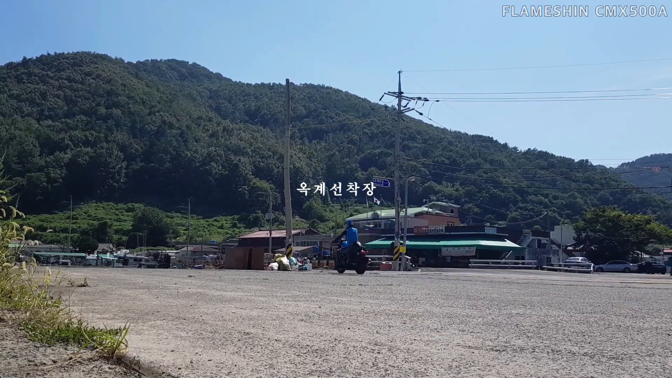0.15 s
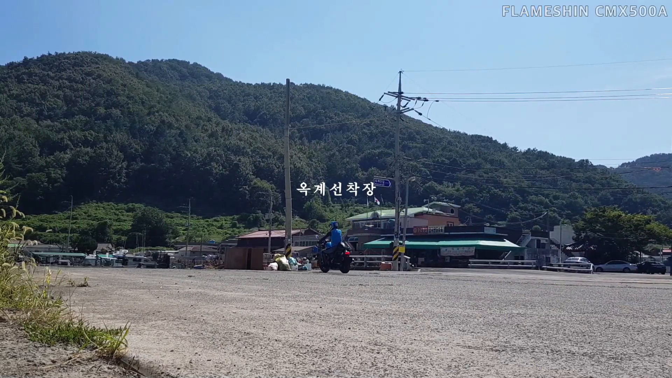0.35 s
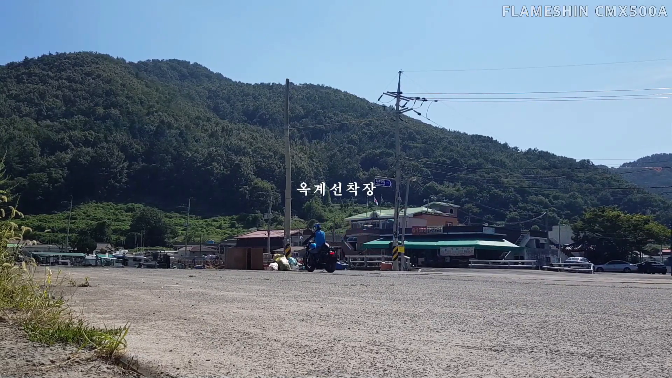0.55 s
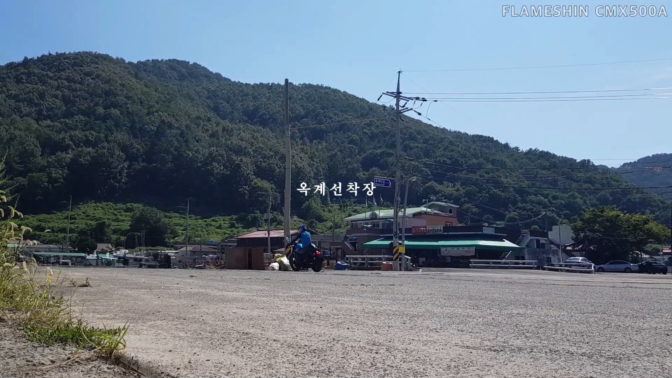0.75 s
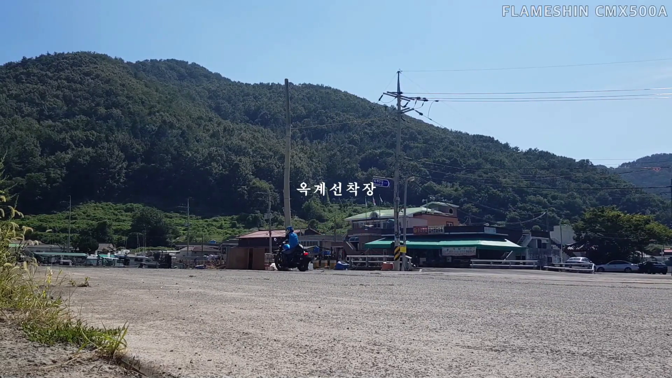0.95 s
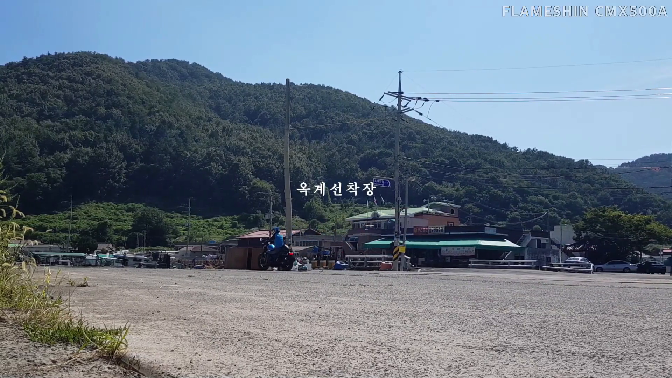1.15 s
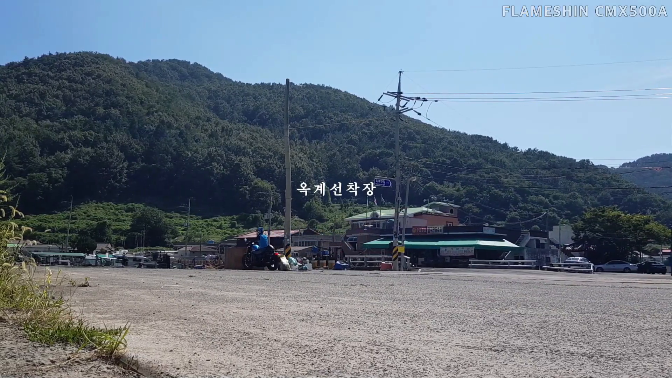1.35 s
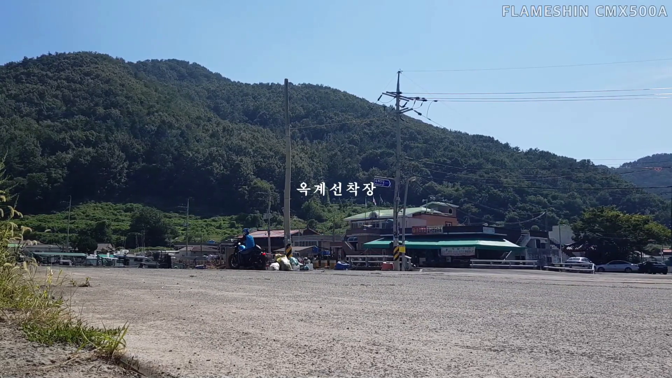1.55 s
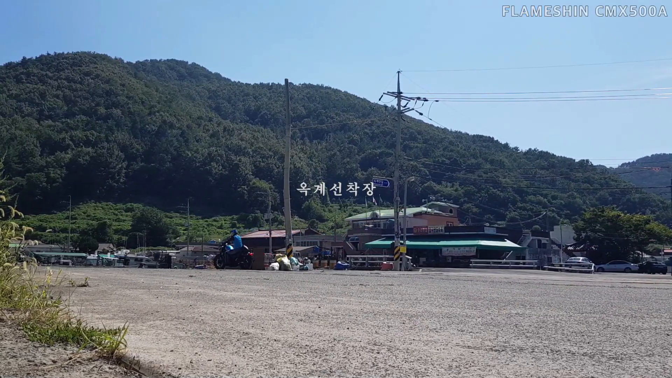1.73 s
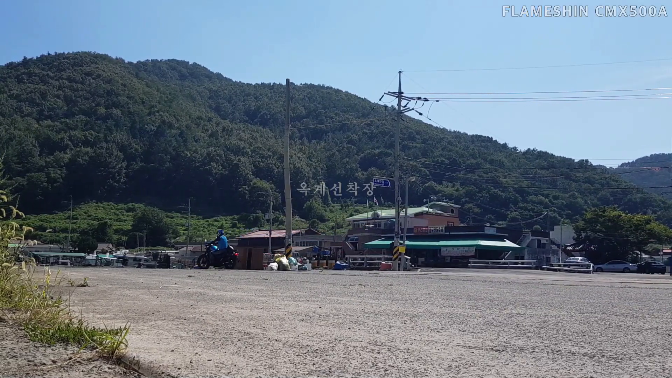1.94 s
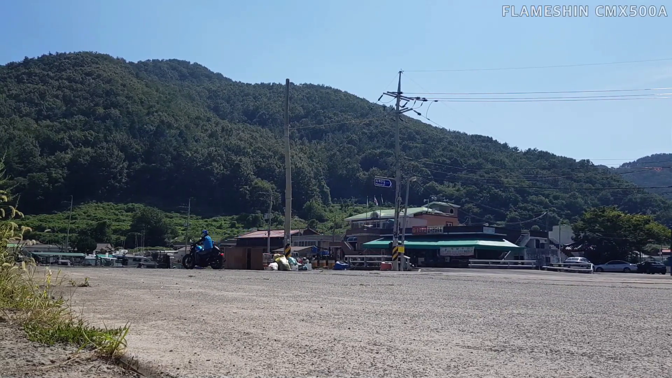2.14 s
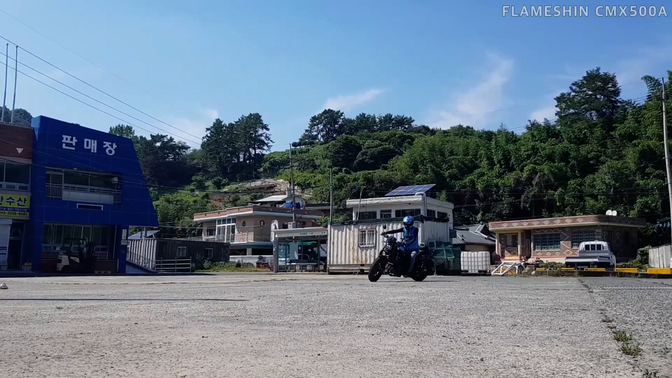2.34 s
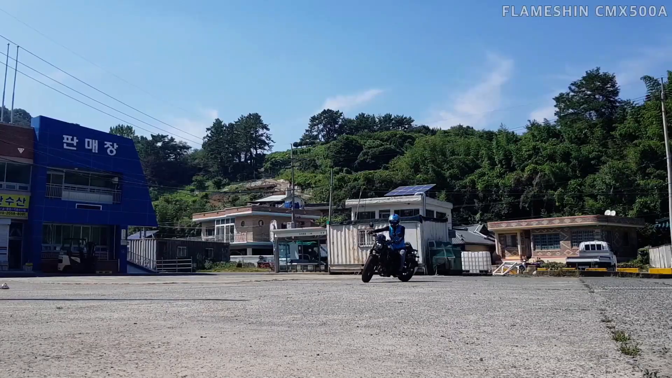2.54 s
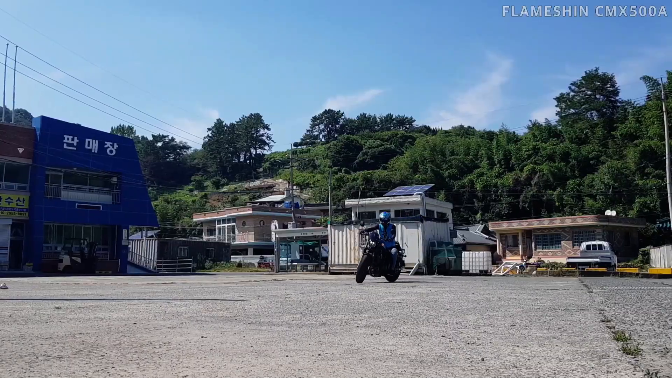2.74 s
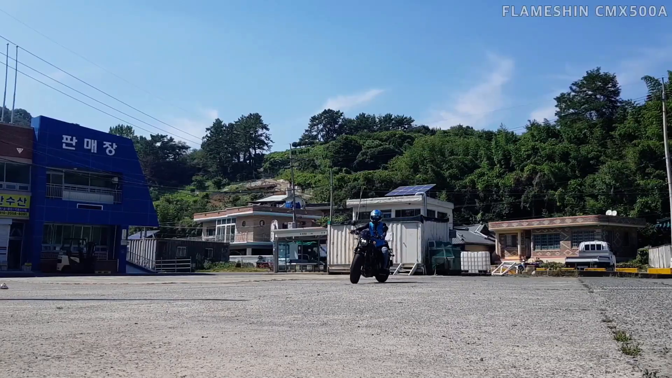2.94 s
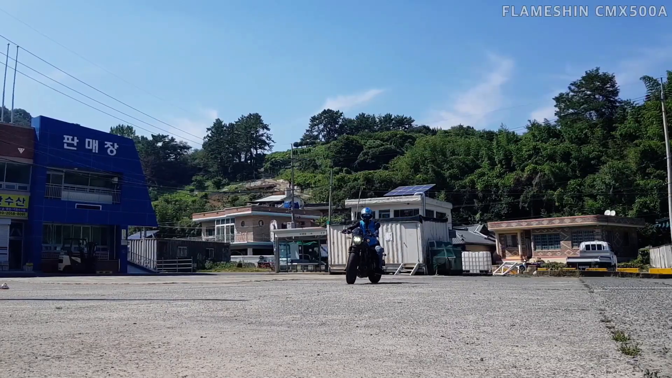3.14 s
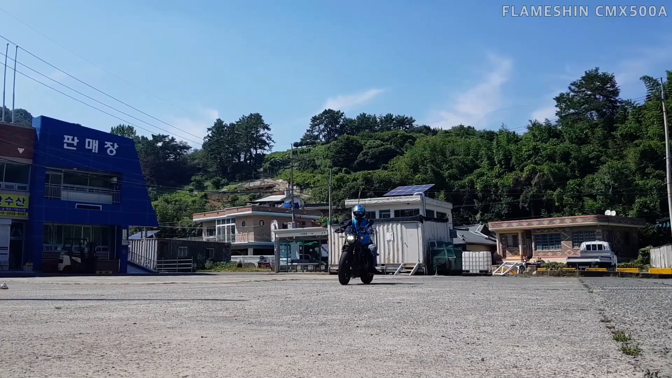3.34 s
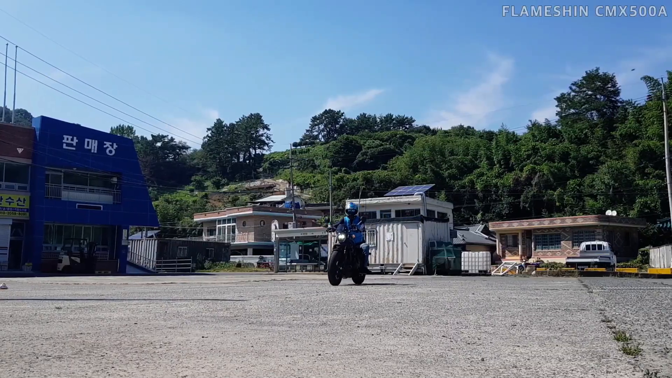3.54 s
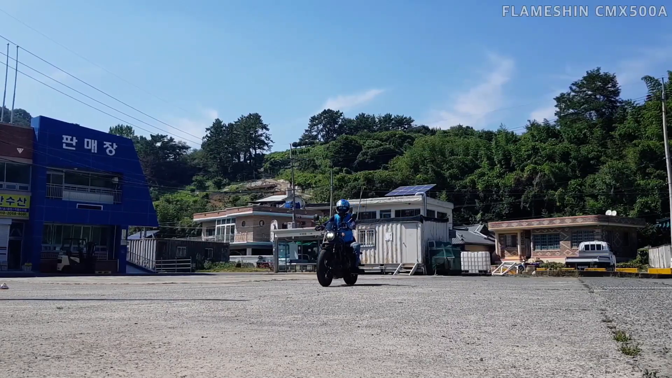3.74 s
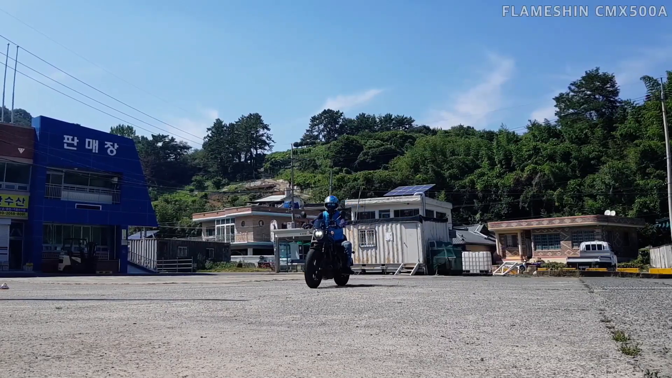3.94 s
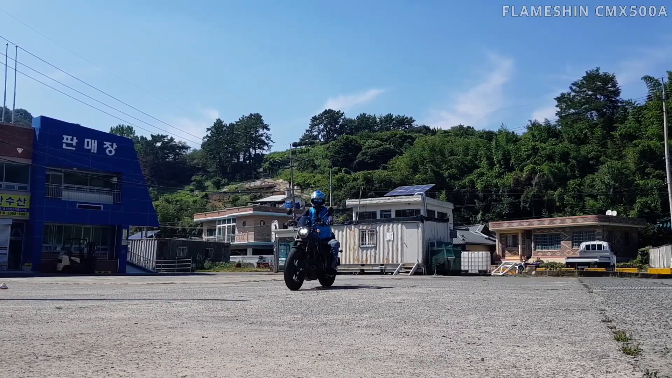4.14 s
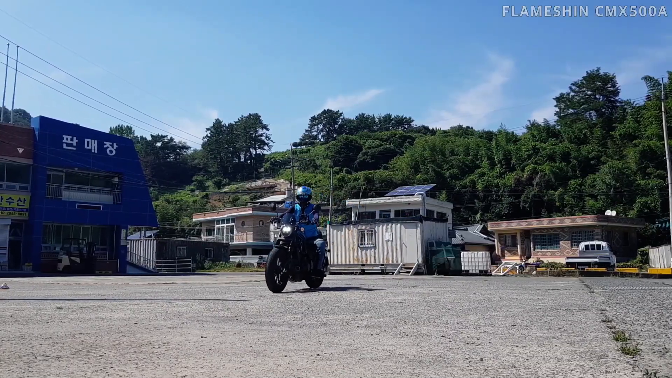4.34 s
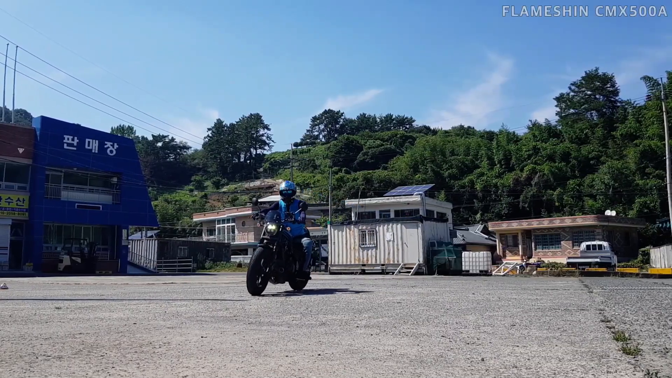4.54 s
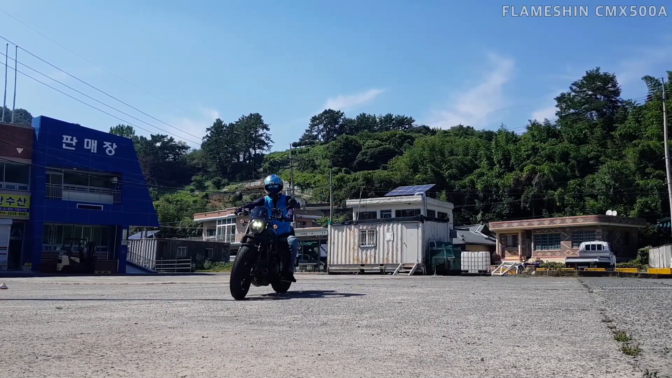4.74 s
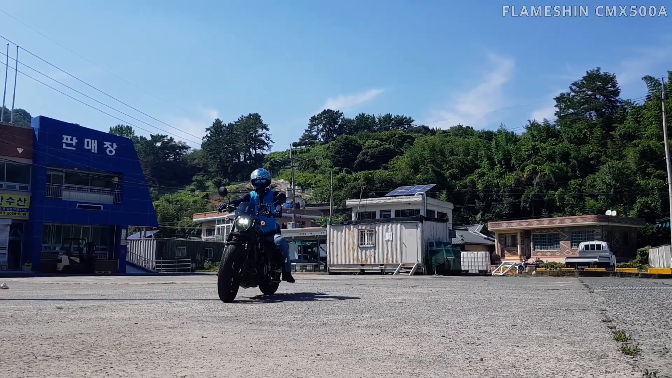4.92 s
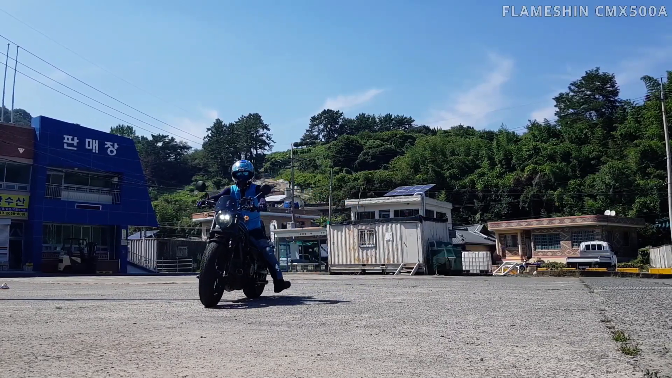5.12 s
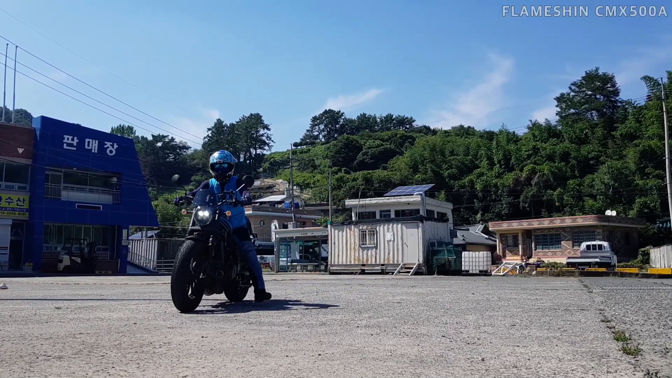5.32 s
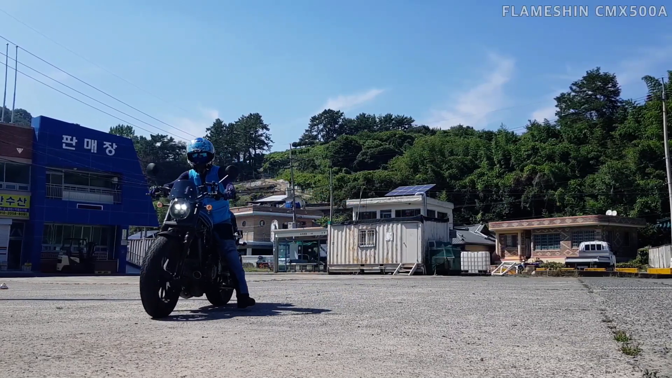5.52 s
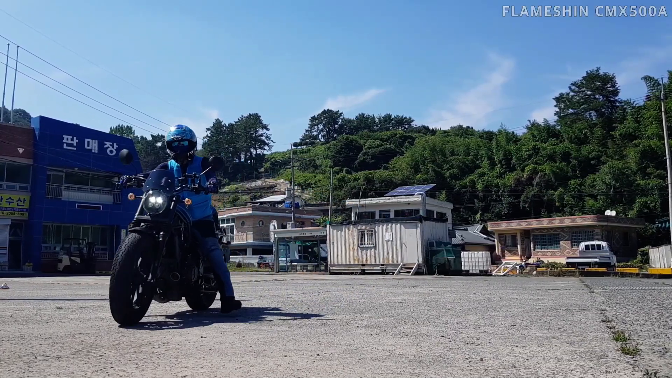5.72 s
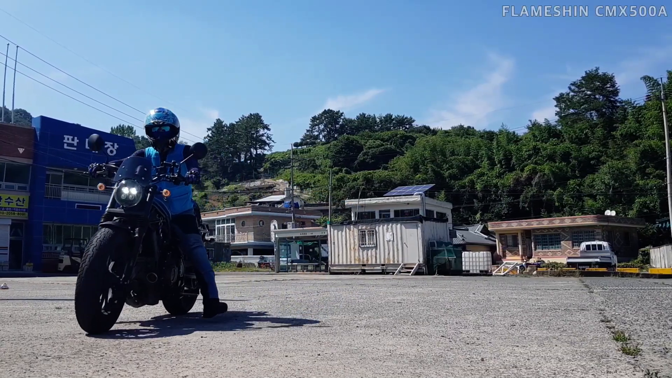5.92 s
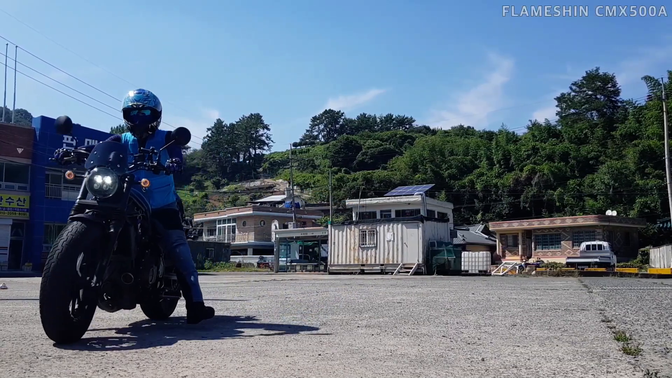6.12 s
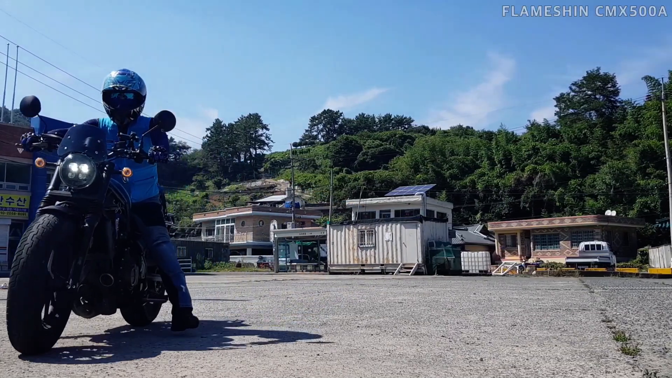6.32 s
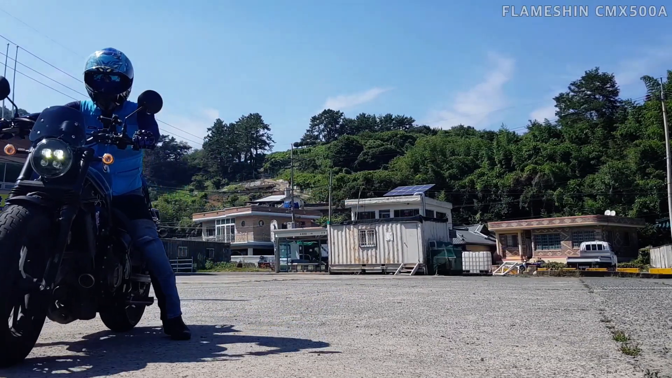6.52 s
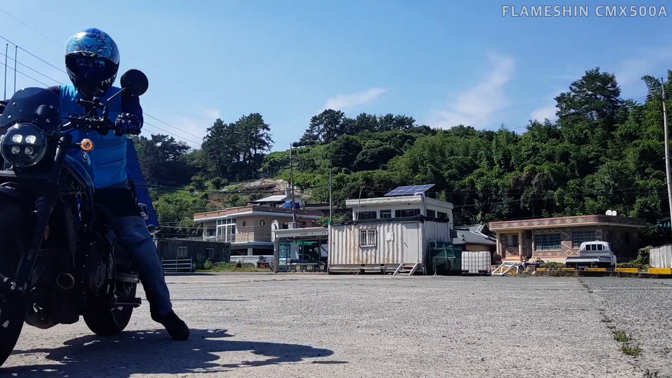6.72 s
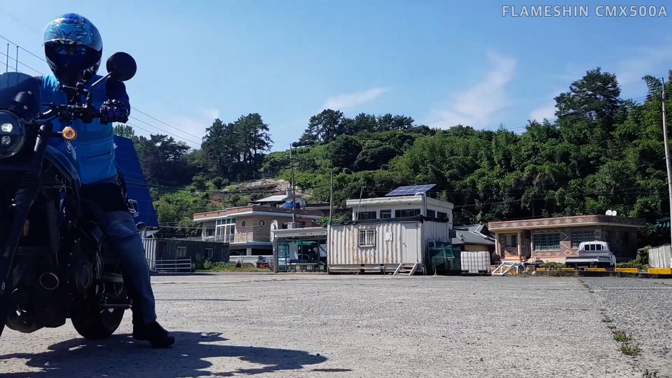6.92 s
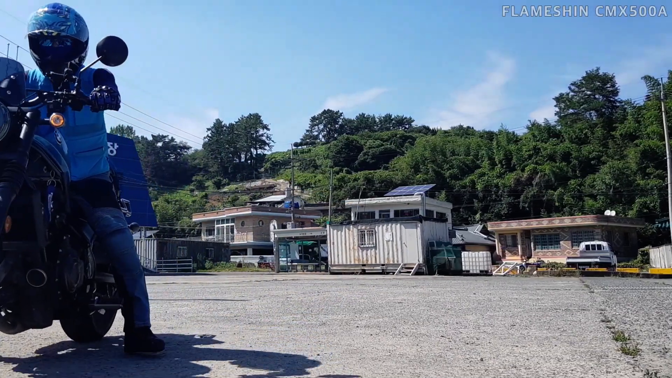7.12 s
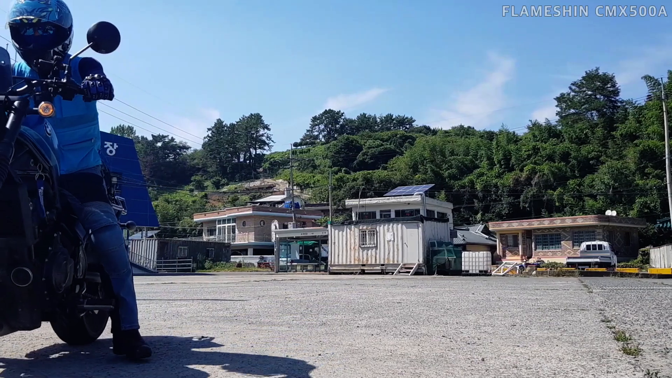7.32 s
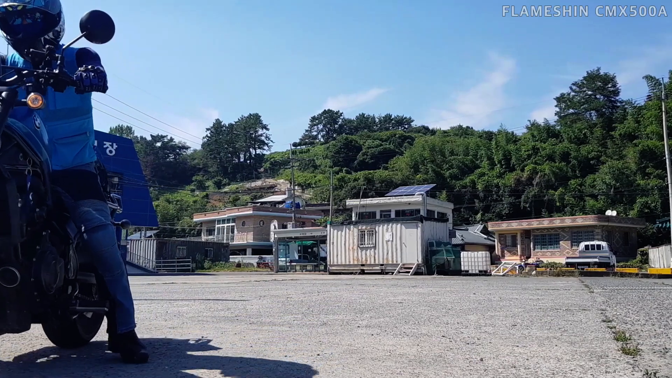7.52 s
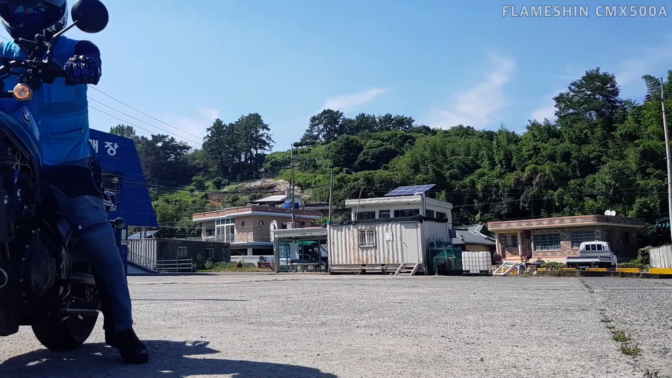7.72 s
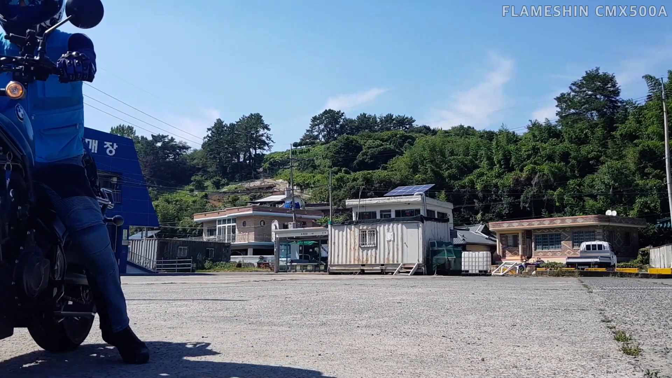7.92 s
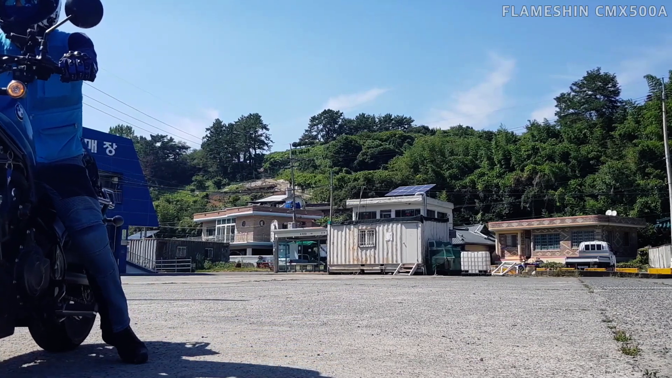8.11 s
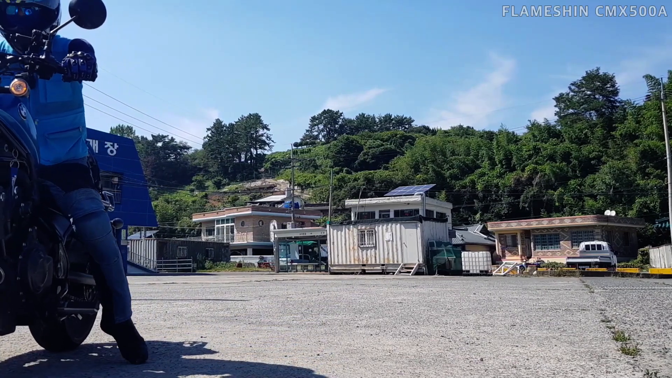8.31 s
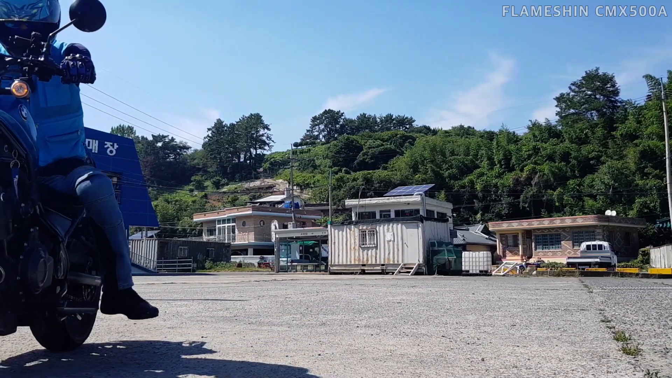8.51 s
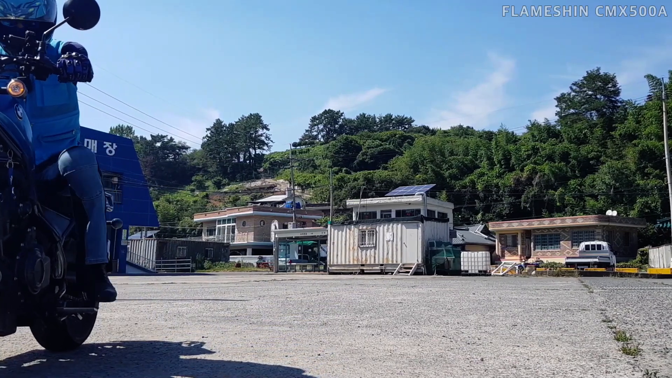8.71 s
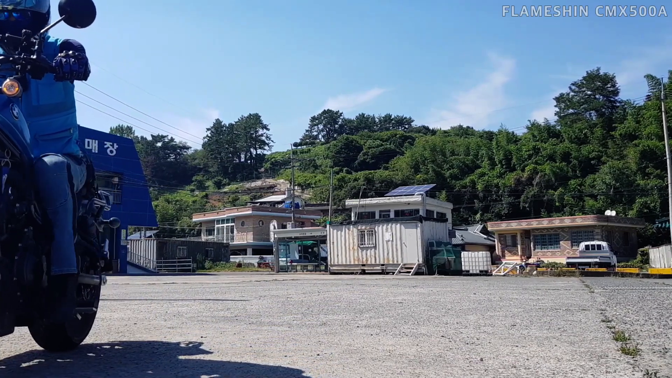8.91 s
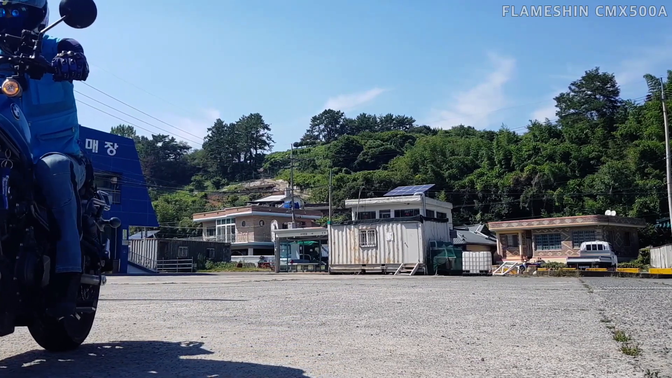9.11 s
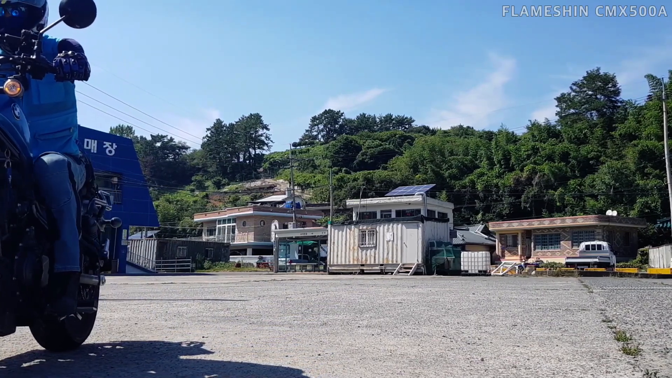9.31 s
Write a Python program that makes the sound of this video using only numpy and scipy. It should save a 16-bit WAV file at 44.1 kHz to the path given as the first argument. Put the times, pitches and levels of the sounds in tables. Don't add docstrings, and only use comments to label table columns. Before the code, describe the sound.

Stereo outdoor pickup of a motorcycle with a deep, lumpy idle: two close thumps, then a pause, about ten times a second. It begins far off and dull with wall echoes, one brief bird whistle and cicadas. After a momentary gap it is nearer, revs up gently, falls back, and approaches over snapping grit. It ends idling close on the left, mechanical ticking and electric whine clearer.

```python
import sys
import numpy as np
from scipy import signal
from scipy.fft import rfft, irfft, next_fast_len
from scipy.io import wavfile
from scipy.ndimage import uniform_filter1d, map_coordinates

SR = 44100
rng = np.random.default_rng(int(sys.argv[2]) if len(sys.argv) > 2 else 0)


def generate_wav(signal):
    frames = np.transpose(np.atleast_2d(signal))
    scaled = np.clip(frames, -1, 1) * 32767
    pcm = np.round(scaled).astype(np.int16)
    wavfile.write(sys.argv[1], SR, pcm)


def voltage_ratio(level):
    return 10 ** (np.asarray(level, float) / 20)


N = 417186

# [t/s, distance/m, right microphone's delay after the left/ms]
BIKE_PATH = [(0, 14.2, -0.1), (1.2, 20.1, 0.039), (1.7, 22, 0.12), (2.28, 19, .11), (2.3, 10.5, -0.046),
             (2.6, 7.95, -0.051), (3.3, 8.7, -0.044), (4.5, 6.4, 0.028), (5.4, 4.7, 0.084),
             (6.1, 4.44, 0.13), (7.0, 4.09, .19), (9.46, 3.81, 0.21)]
# [t/s, speed/cycles per s]
ENGINE_SPEED = [(0, 9.975), (.76, 9.93), (.85, 9.845), (2.28, 9.959), (2.29, 12.58), (2.79, 13.114),
                (2.865, 12.305), (3.537, 14.749), (3.881, 16.165), (4.411, 10.635), (4.777, 10.186),
                (5.533, 10.144), (6.077, 9.685), (6.764, 9.716), (7.389, 10.103), (8.097, 9.752),
                (8.283, 9.953), (9.46, 9.906)]
# [t/s, cycles done]
CRANK_START = [
    (0, -.0175),
    (2.29, 23.1005),
]
# [t/s, extra firing level/dB, upper pipe modes level/dB]
THROTTLE_CURVE = [(0, -2.5, -2), (1.3, 0, 2.5), (2.28, 1.5, -2.5), (2.32, -3, 2), (3.3, .5, 3.5),
                  (3.6, 2, -1.5), (3.95, 0.0, 9), (4.03, -2, -6), (4.14, -5, 3), (4.45, -1, 0),
                  (4.8, 0.5, 1), (5.5, 0.0, -1), (9.46, -0.5, 1.5)]
IDLE_PER_S = 10
CUT_FROM_S, CUT_TO_S = 2.2615, 2.313

# [share of cycle, level/dB]
FIRING_ORDER = [
    (0.0, 1),
    (0.236, 0.47),
    (0.477, -10),
]
# [f/Hz, level/dB, t60/s]
PIPE_MODES = [(44.2, -15.5, 0.27), (67, -3.5, 0.14), (111.9, 5.5, 0.12), (167.2, 6, 0.068),
              (204.7, -7, 0.14), (259, -16, 0.22)]
# [f/Hz, width/Hz, level/dB]
BARK_MODES = [(223.3, 26, -1.0), (249, 52.6, -4.5)]
FIRING_DB, FIRING_FOLLOWS = -7, .95

# [share of cycle, level on cases/dB, level on covers/dB]
VALVE_CONTACTS = [
    (.19, 1, -17),
    (.41, 1, 1),
    (.47, -23, -18),
    (.73, -17, 0.5),
    (.91, -2, 3.5),
    (.97, -5, -3),
]
# [f/Hz, width/Hz, level/dB]
CASE_MODES = [(283, 110, -7.5), (427.2, 40, 8), (598, 29, 3.5), (718, 42, -1)]
# [f/Hz, width/Hz, level/dB]
COVER_MODES = [(728, 63, 3.5), (976, 53, 8), (1250, 400, -6), (1734, 175, -1), (2090, 320, -1)]
# [f/Hz, width/Hz, level/dB]
TICK_MODES = [(2590, 1350, -6), (3770, 500, -0.5), (4700, 560, -2)]
# [f/Hz, level/dB per Hz]
ROAR_SPECTRUM = [(200, -0.5), (340, -9.5), (600, -10), (1200, -12), (2400, -19.5), (3500, -40)]
# [f/Hz, level/dB per Hz]
SCATTER_SPECTRUM = [(250, -3), (430, -5.5), (900, -5), (1600, -7.5), (2600, -9.5), (3500, -9.5)]
# [f/Hz, level/dB per Hz]
CHAIN_SPECTRUM = [(3000, -8.5), (4700, -0.5), (6500, -1), (9500, -8), (11500, -16), (14000, -16),
                  (15700, -20)]
# [f/Hz, level/dB per Hz]
SIZZLE_SPECTRUM = [(9000, -6), (11300, 1), (12700, -6), (14200, -2.5), (15700, -6)]
RATTLE_DB, RATTLE_DB_PER_REV = -32, 0.49
TICKS_DB, TICKS_FOLLOW, TICKS_DB_PER_REV = -40, 1.03, 0.68
AIR_DB_PER_M = 0.76
SIZZLE_DB, SIZZLE_FOLLOWS, SIZZLE_DB_PER_REV = -50, 2.3, 1.3

PUMP_HZ = 98.04
# [multiple of PUMP_HZ, level against the bright ticks/dB]
PUMP_LINES = [(15, -16), (17, -12), (18, -14), (19, -14), (20, -8), (21, -10), (22, -7), (23, -13),
              (27, -16), (33, -8), (34, -15), (44, -22), (47, -22), (54, -24)]
# [t/s, level/dB]
PUMP_HIDING = [
    (0, -14),
    (5.0, -9),
    (5.8, -13.5),
    (6.8, 0.5),
    (9.46, 1.5),
]

# [t/s, peak level/dB, f/Hz, t60/s, crack level/dB]
KNOCK_EVENTS = [
    (0.282, -26, 358, 0.12, -8.5),
    (2.6907, -1, 1250, 0.014, -11),
    (4.704, -9, 1120, 0.015, -25),
    (5.285, -31, 4950, 0.021, 5.5),
    (8.912, -23, 6400, 0.043, -8),
]
# [multiple of its f, level/dB]
KNOCK_RINGING = [(.62, -0.5), (1.0, 4.5), (1.35, -2), (1.75, -9), (2.2, -14)]
# [t/s, peak level/dB]
GRIT_SNAPS = [(3.132, -37), (3.928, -37), (4.358, -34), (4.985, -38), (5.052, -41), (5.284, -28),
              (5.449, -31), (5.565, -38), (5.998, -36), (8.911, -31)]

# [delay/s, gain]
WALL_ECHOES = [(.057, 0.82), (.085, -0.16), (.131, 0.19)]
ECHO_DB, ECHO_FOLLOWS = -29.5, 1.63
# [t/s, f/Hz, level/dB]
BIRD_WHISTLE = [(0, 4250, -56), (.04, 4450, -55), (.07, 4720, -56.5), (.11, 4830, -54), (.15, 4700, -54),
                (.18, 4350, -52), (.2, 4260, -54), (.225, 4350, -58)]
# [f/Hz, level/dB per Hz]
BREEZE_SPECTRUM = [(14, -19), (24, 0), (34, -3), (60, -20)]
# [f/Hz, level/dB per Hz]
CICADA_SPECTRUM = [(2500, -26), (4500, -10.5), (5400, -14.5), (7000, -8), (8500, -0.5), (9600, -6),
                   (11500, -29), (15500, -28)]
CICADA_DB, CICADA_TOP_DB = -44.5, -41
CICADA_DUCK = 0.54


def rms_one(x):
    return x / np.sqrt(np.mean(x ** 2) + 1e-20)


def in_time(*tables):
    s, *columns = np.concatenate(tables).T
    return [np.interp(np.arange(N) / SR, s, c) for c in columns]


def drift(rate):
    r = np.exp(-80 * np.pi * rate / SR)
    slow = signal.lfilter([1], [1, -2 * r, r * r], rng.standard_normal(N // 40 + 2002))[2000:]
    return np.interp(np.arange(N) / 40, np.arange(len(slow)), rms_one(slow))


def ring(clicks, hz, t60):
    r, w = voltage_ratio(-60 / (t60 * SR)), 2 * np.pi * hz / SR
    return signal.lfilter([0, np.sin(w)], [1, -2 * r * np.cos(w), r * r], clicks + 1e-18)


def resonate(x, modes):
    out = 0
    for k, (hz, width, db) in enumerate(modes):
        r = np.exp(-np.pi * width / SR)
        push = (1 - r * r) / 2 * np.array([1, 0, -1])
        swing = [1, -2 * r * np.cos(2 * np.pi * hz / SR), r * r]
        out = out + (-1) ** k * voltage_ratio(db) * signal.lfilter(push, swing, x)
    return rms_one(out)


def coloured(spectrum, channels):
    hz, db = np.transpose(spectrum)
    size = next_fast_len(N)
    grid = np.maximum(np.arange(size // 2 + 1) * SR / size, 1)
    gain = voltage_ratio(np.interp(np.log(grid), np.log(hz), db, left=-90, right=-90))
    noise = rfft(rng.standard_normal((channels, size)))
    return rms_one(irfft(noise * gain, size)[:, :N])


def delayed(x, s):
    return map_coordinates(x, [np.arange(N) - s * SR], order=3, mode="nearest")


def alike(pair, share):
    return rms_one(pair + share * pair[::-1])


def strokes(angle, centres, width):
    return sum(np.exp(-.5 * (((angle - c + .5) % 1 - .5) / width) ** 2) for c in centres)


def passes(angle, share):
    return np.flatnonzero(np.diff((angle - share) % 1) < -.5)


def grains(per_s, spread_db):
    sizes = voltage_ratio(spread_db * np.minimum(rng.exponential(1, N), 4)) * rng.choice([-1, 1], N)
    return sizes * (rng.random(N) < per_s / SR)


def crank_cycles():
    done = np.cumsum(in_time(ENGINE_SPEED)[0]) / SR
    first, second = (done - done[int(s * SR)] + cycles for s, cycles in CRANK_START)
    return np.where(np.arange(N) < (CUT_FROM_S + CUT_TO_S) / 2 * SR, first, second)


def exhaust(cycles, strength, sharp_db, uneven_db, jitter_s, turbulence_db):
    puff_hz, pipe_delay_s = 114.3, 0.0076
    misfire_s, misfire_db = 4.012, -31
    clicks, count = np.zeros(N), np.arange(int(cycles[-1]) + 1)
    for share, firing_db in FIRING_ORDER:
        chance = rng.standard_normal((len(count), 2))
        at = np.interp(count + share, cycles, np.arange(N))
        at = at + SR * (jitter_s * chance[:, 0] - pipe_delay_s)
        missed = np.abs(at / SR - misfire_s) < .006
        level_db = firing_db + uneven_db * chance[:, 1] + misfire_db * missed
        clicks[np.maximum(at, 0).astype(int)] += voltage_ratio(level_db)

    late = round(0.0216 * SR)
    clicks = clicks + voltage_ratio(-17) * delayed(clicks, late / SR) * (np.arange(N) >= late)
    clicks = voltage_ratio(strength) * (clicks + voltage_ratio(turbulence_db) * rng.standard_normal(N))
    r = np.exp(-2 * np.pi * puff_hz / SR)
    puffs = signal.lfilter([(1 - r) ** 2], [1, -2 * r, r * r], clicks)
    modes = [(-1) ** (k + 1) * voltage_ratio(db) * ring(puffs, hz, t60) for k, (hz, db, t60) in enumerate(PIPE_MODES)]

    start, end, fade, boom_db = 4.02, 4.3, 0.067, 4.5
    corners = [start - fade / 4, start, end, end + fade]
    boom = voltage_ratio(np.interp(np.arange(N) / SR, corners, [0, boom_db, boom_db, 0]))
    return boom * sum(modes[:2]) + sum(modes[2:4]) + voltage_ratio(sharp_db) * sum(modes[4:])


def bark(angle, db):
    gust = strokes(angle, [.1, .36], 0.087) + 0.2 * strokes(angle, [.5], 0.1) + 0.021
    return voltage_ratio(db) * resonate(rng.standard_normal(N) * gust, BARK_MODES)


def pop(angle, strength):
    clicks, at = np.zeros(N), passes(angle, .42)
    clicks[at] = voltage_ratio(strength[at] - 18 + 1.5 * rng.standard_normal(len(at)))
    return ring(uniform_filter1d(clicks, size=60), hz=248, t60=0.1)


def taps(angle, column):
    out = np.zeros(N)
    for row in VALVE_CONTACTS:
        at = passes(angle, row[0])
        out[at] = voltage_ratio(row[column] + 3.5 * rng.standard_normal(len(at)))
    return rms_one(out)


def rattle(angle, low_db, high_db):
    thud = voltage_ratio(1.45 * strokes(angle, [.43, .92], 0.086) + 1.03 * drift(2.6))
    busy = voltage_ratio(2.1 * strokes(angle, [.2, .76, .94], 0.023) + 1.0 * drift(5.4))
    case_blows = rms_one(grains(3000, 2.35) * thud) + voltage_ratio(-6.5) * taps(angle, column=1)
    cover_blows = rms_one(grains(4000, 3.9) * busy) + voltage_ratio(-5.0) * taps(angle, column=2)
    cases = resonate(case_blows, CASE_MODES)
    covers = resonate(cover_blows, COVER_MODES)
    roar = rms_one(coloured(ROAR_SPECTRUM, channels=1)[0] * busy)

    near = rms_one(cases + voltage_ratio(-3.0) * covers + voltage_ratio(1.5) * roar)
    dull = signal.butter(1, 500, fs=SR, output="sos")
    far = rms_one(signal.sosfilt(dull, roar + .5 * near))
    closeness = np.clip((low_db + 43) / 3.4, 0, 1)

    tick_busy = voltage_ratio(2.0 * strokes(angle, [.05, .3, .8], 0.057) + 2.3 * drift(2.2))
    ticks = resonate(grains(10000, 2.4) * tick_busy, TICK_MODES)
    return voltage_ratio(low_db) * (closeness * near + (1 - closeness) * far) + voltage_ratio(high_db - 1.5) * ticks


def pump(db):
    turns = PUMP_HZ * np.cumsum(1 + .0003 * drift(2)) / SR
    lines = (voltage_ratio(g) * np.sin(2 * np.pi * (k * turns + rng.random())) for k, g in PUMP_LINES)
    return np.sqrt(2) * voltage_ratio(db) * sum(lines)


def chain(high_db):
    hiss = alike(coloured(CHAIN_SPECTRUM, channels=2), 0.0057)
    return voltage_ratio(high_db - 2.0 + 1.37 * drift(20.0)) * hiss * voltage_ratio([[-.8], [.8]])


def sizzle(near_db, revs):
    db = SIZZLE_DB + SIZZLE_FOLLOWS * near_db + SIZZLE_DB_PER_REV * revs + 1.7 * drift(9.6)
    return voltage_ratio(db) * alike(coloured(SIZZLE_SPECTRUM, channels=2), 0.087)


def scattered(low_db):
    return voltage_ratio(low_db - 11) * coloured(SCATTER_SPECTRUM, channels=2)


def knocks(lag_ms):
    out, t = np.zeros((2, N)), np.arange(2000) / SR
    band = signal.butter(2, [400, 3300], "band", fs=SR, output="sos")
    for s, db, hz, t60, crack_db in KNOCK_EVENTS:
        click = np.zeros(2000)
        click[[0, 24]] = -.2, 1
        body = sum((-1) ** j * voltage_ratio(g) * ring(click, hz * k, t60) for j, (k, g) in enumerate(KNOCK_RINGING))
        crack = rms_one(signal.sosfilt(band, rng.standard_normal(2000)))
        crack = crack * (1 - np.exp(-t / 0.00013)) * voltage_ratio(-60 * t / (0.77 * t60))
        hit = voltage_ratio(db) * (body / np.abs(body).max() + voltage_ratio(crack_db) * crack)
        at = round(s * SR)
        out[:, at:at + 2000] += [np.interp(t + side * lag_ms[at] / 2000, t, hit) for side in (1, -1)]
    return out


def grit():
    out, t = np.zeros((2, N)), np.arange(400) / SR
    for s, db in GRIT_SNAPS:
        at = round(s * SR)
        hiss = alike(rng.standard_normal((2, 400)), .6)
        out[:, at:at + 400] += voltage_ratio(db) * np.exp(-t / 0.0013) * hiss
    return signal.sosfilt(signal.butter(2, 5000, "high", fs=SR, output="sos"), out)


def yard(x):
    dull = signal.sosfilt(signal.butter(1, 2500, fs=SR, output="sos"), x)
    shared = sum(g * delayed(dull, s) for s, g in WALL_ECHOES)
    return np.array([shared + 0.13 * delayed(dull, 0.0328), shared + 0.33 * delayed(dull, 0.0406)])


def bird():
    hz, db = in_time(BIRD_WHISTLE)
    fade = np.clip((BIRD_WHISTLE[-1][0] - np.arange(N) / SR) / 0.017, 0, 1)
    return voltage_ratio(db - 1.0 + 2.7 * drift(39)) * fade * np.sin(2 * np.pi * np.cumsum(hz) / SR)


def breeze(strength):
    return voltage_ratio(strength - 43 + 3.5 * drift(1.73)) * coloured(BREEZE_SPECTRUM, channels=1)


def cicadas(db):
    buzz = voltage_ratio(0.33 * drift(59) + 0.64 * drift(4.5))
    return voltage_ratio(db) * alike(coloured(CICADA_SPECTRUM, channels=2) * buzz, 0.011) * voltage_ratio([[-.5], [.5]])


def scene():
    metres, lag_ms = in_time(BIKE_PATH)
    load_db, sharp_db = in_time(THROTTLE_CURVE)
    near_db = -20 * np.log10(metres / 4)
    revs = in_time(ENGINE_SPEED)[0] - IDLE_PER_S
    strength = FIRING_DB + FIRING_FOLLOWS * near_db + load_db
    low_db = RATTLE_DB + near_db + RATTLE_DB_PER_REV * revs
    high_db = TICKS_DB + TICKS_FOLLOW * near_db + TICKS_DB_PER_REV * revs
    high_db = high_db - AIR_DB_PER_M * np.maximum(metres - 10, 0)
    cicada_db = np.minimum(CICADA_DB - CICADA_DUCK * near_db, CICADA_TOP_DB)

    cycles = crank_cycles()
    angle = cycles % 1
    beat = exhaust(cycles, strength, sharp_db, uneven_db=0.84, jitter_s=0.00047, turbulence_db=-46)
    beat = beat + bark(angle, strength + sharp_db - 32.5) + pop(angle, strength + sharp_db)
    bike = beat + rattle(angle, low_db, high_db) + pump(high_db + in_time(PUMP_HIDING)[0])
    direct = np.array([delayed(bike, -lag_ms / 2000), delayed(bike, lag_ms / 2000)])
    echoes = voltage_ratio(ECHO_DB - ECHO_FOLLOWS * near_db) * yard(beat)

    engine = direct + chain(high_db) + sizzle(near_db, revs) + scattered(low_db)
    contacts = knocks(lag_ms) + grit()
    return engine + contacts + echoes + bird() + breeze(strength) + cicadas(cicada_db)


def top_cut(x):
    return signal.sosfilt(signal.butter(12, 15740, fs=SR, output="sos"), x)


def record(dry):
    t = np.arange(N) / SR
    gate = np.clip(np.maximum(CUT_FROM_S - t, t - CUT_TO_S) / 0.0056, 0, 1)
    heard = signal.sosfilt(signal.butter(1, 8, "high", fs=SR, output="sos"), dry)
    return top_cut(heard * gate)


dry = scene()
out = record(dry)
generate_wav(out)
```